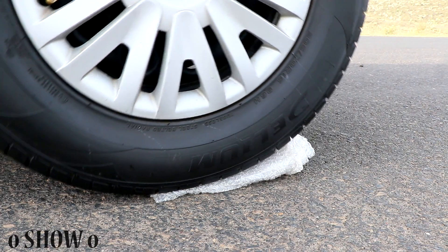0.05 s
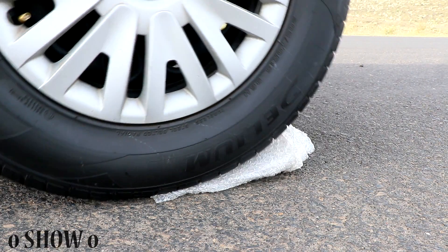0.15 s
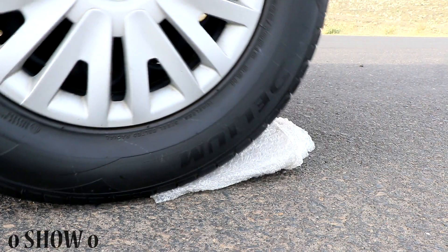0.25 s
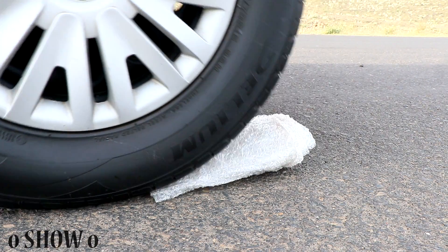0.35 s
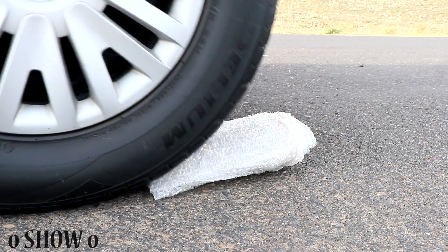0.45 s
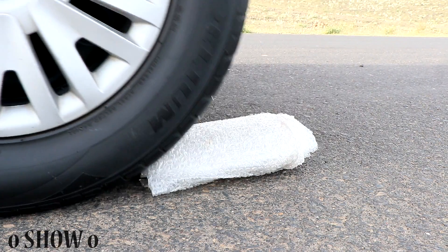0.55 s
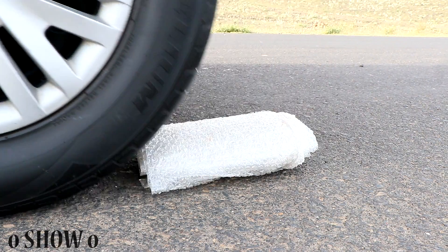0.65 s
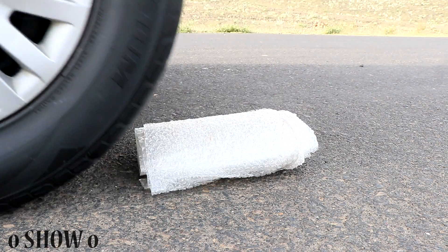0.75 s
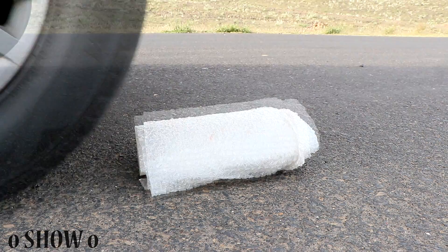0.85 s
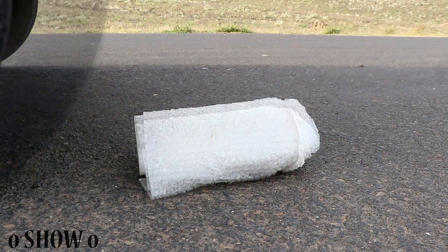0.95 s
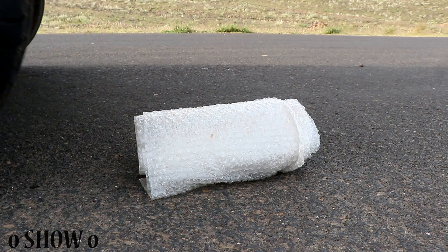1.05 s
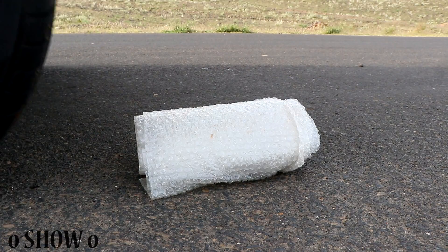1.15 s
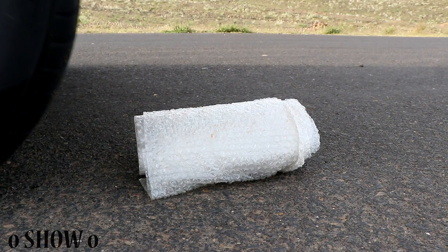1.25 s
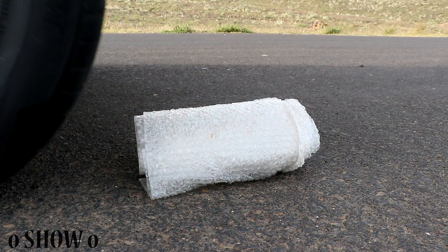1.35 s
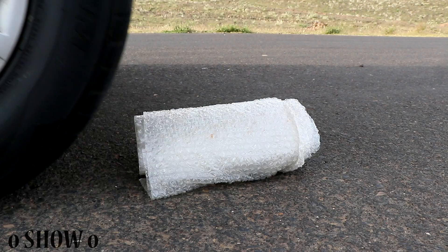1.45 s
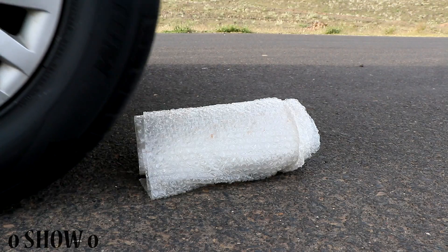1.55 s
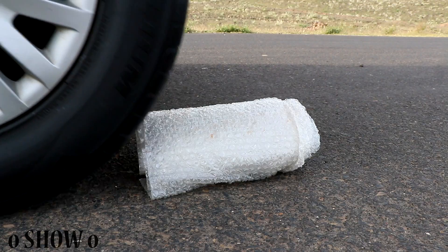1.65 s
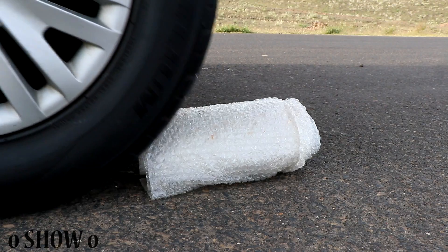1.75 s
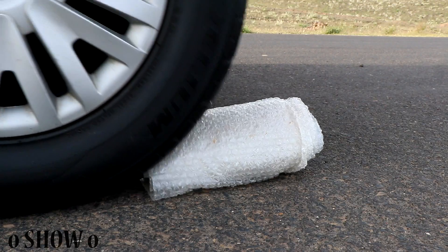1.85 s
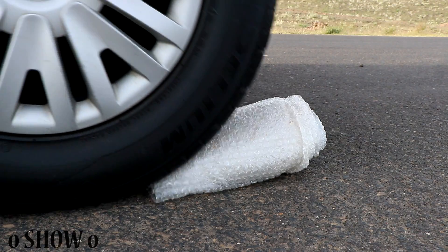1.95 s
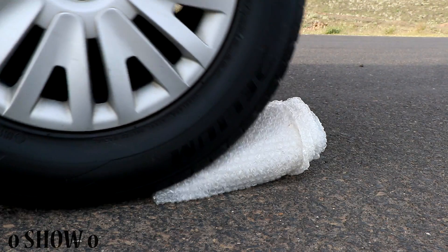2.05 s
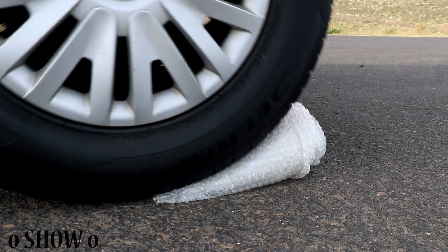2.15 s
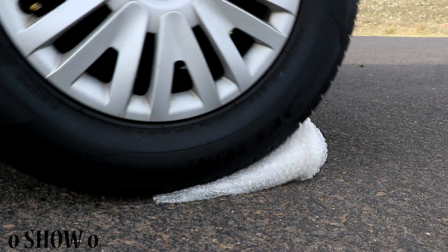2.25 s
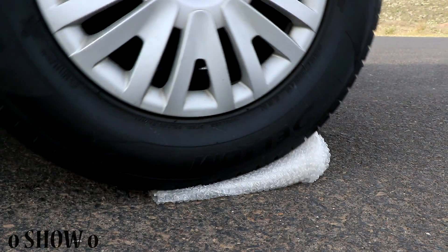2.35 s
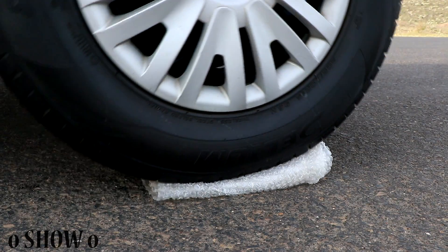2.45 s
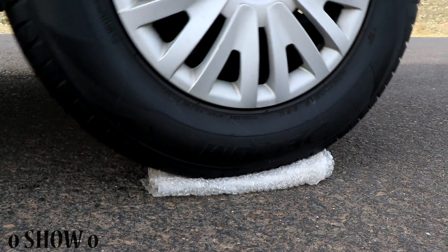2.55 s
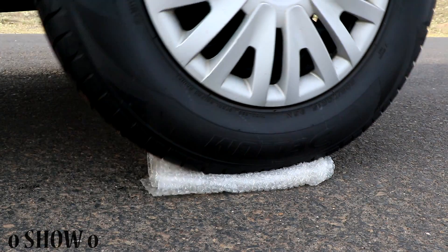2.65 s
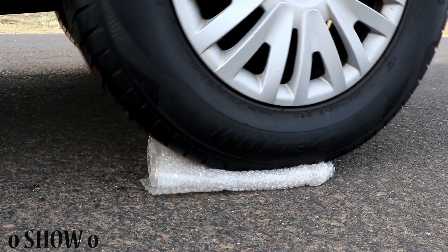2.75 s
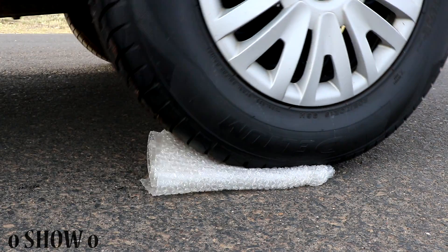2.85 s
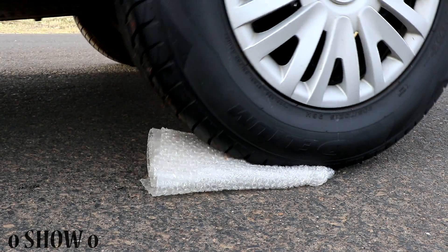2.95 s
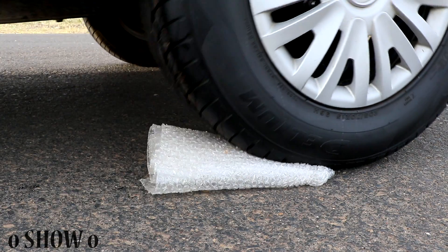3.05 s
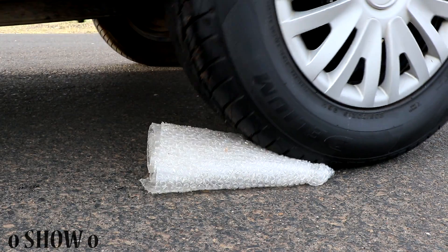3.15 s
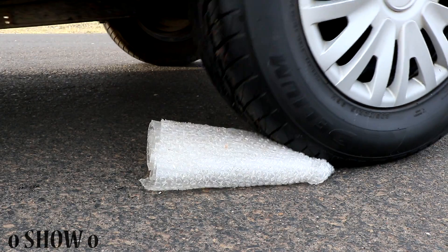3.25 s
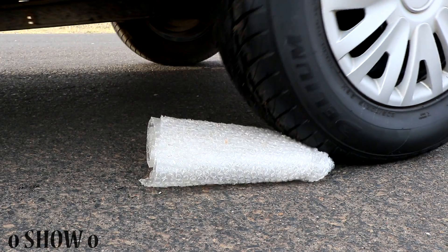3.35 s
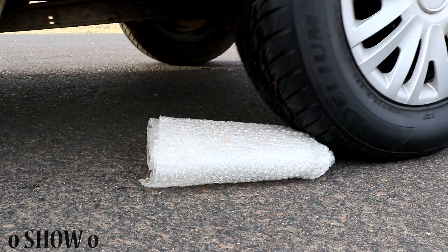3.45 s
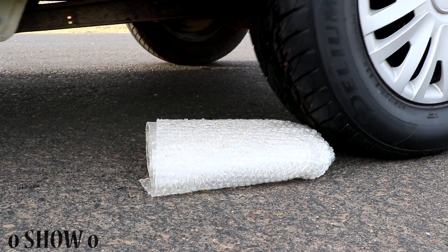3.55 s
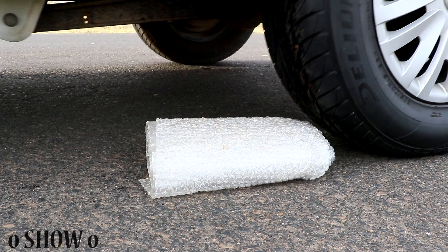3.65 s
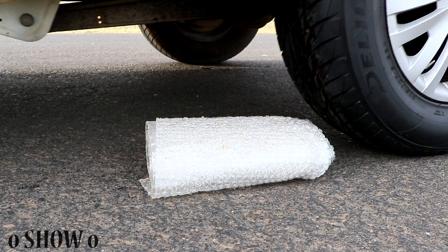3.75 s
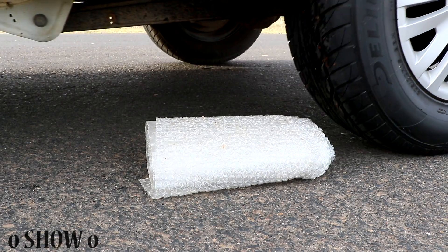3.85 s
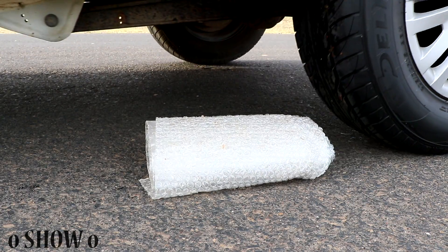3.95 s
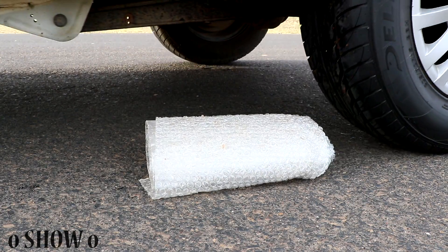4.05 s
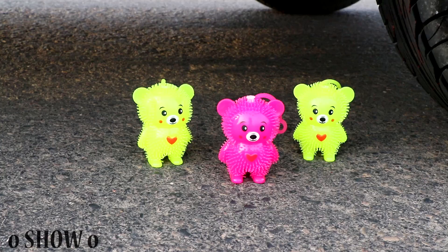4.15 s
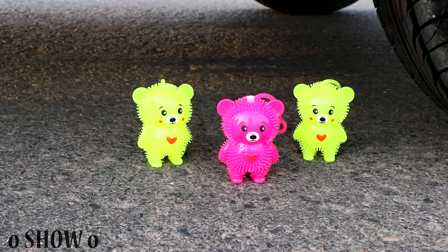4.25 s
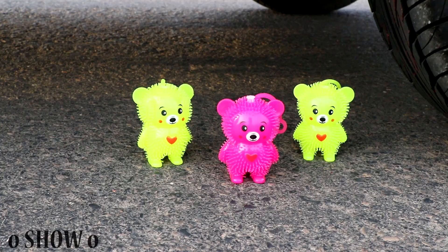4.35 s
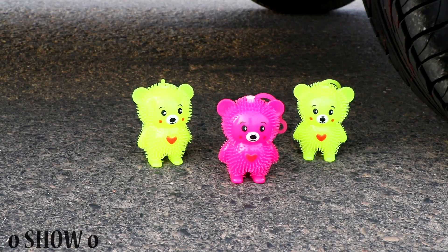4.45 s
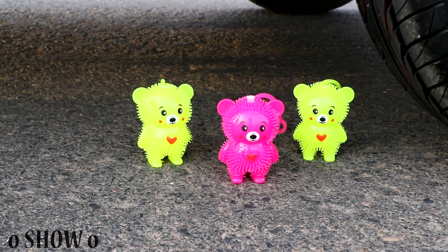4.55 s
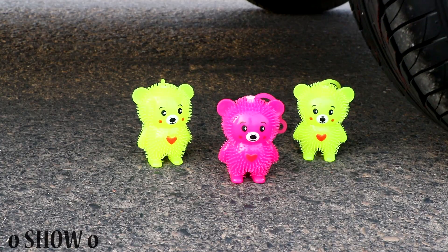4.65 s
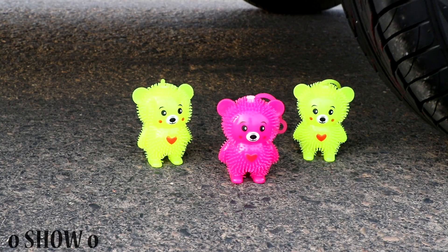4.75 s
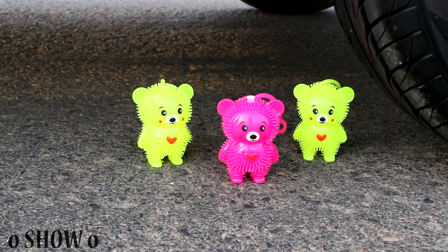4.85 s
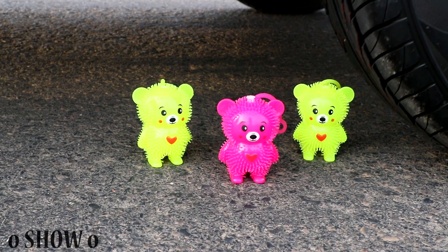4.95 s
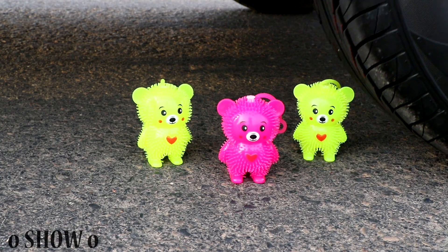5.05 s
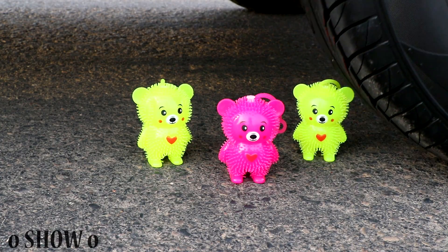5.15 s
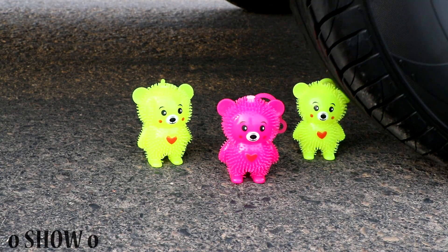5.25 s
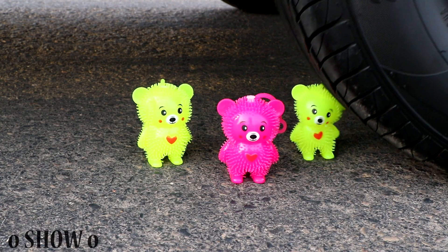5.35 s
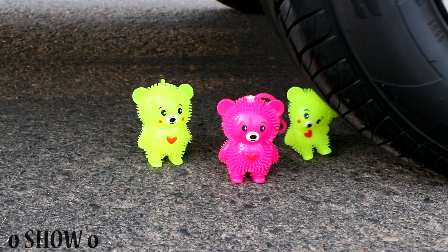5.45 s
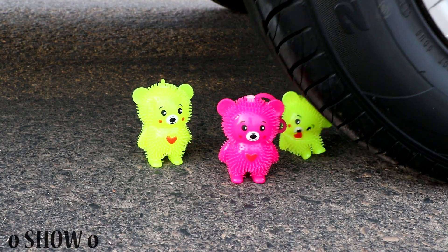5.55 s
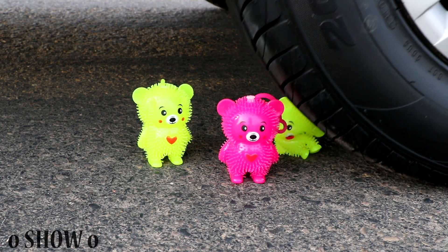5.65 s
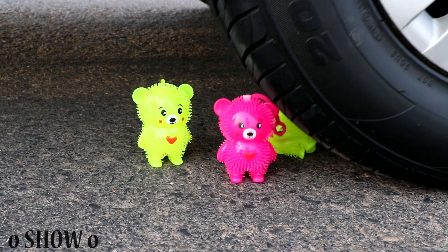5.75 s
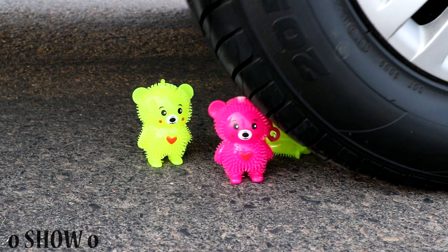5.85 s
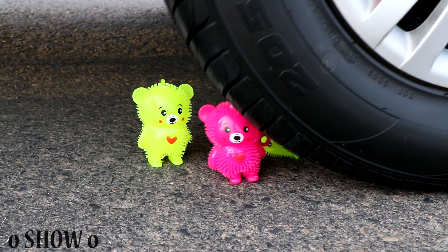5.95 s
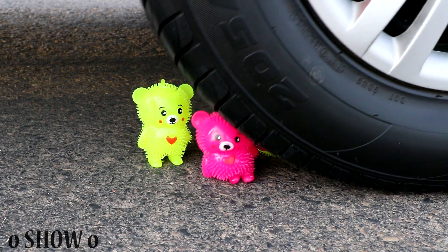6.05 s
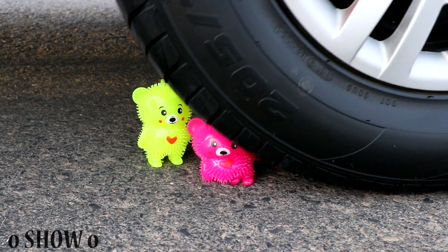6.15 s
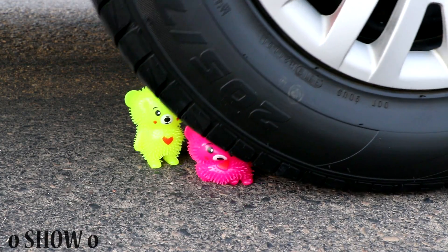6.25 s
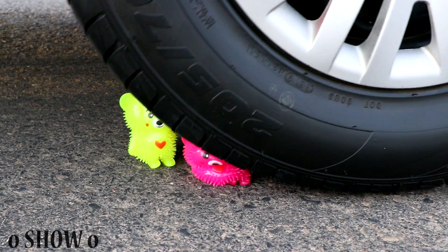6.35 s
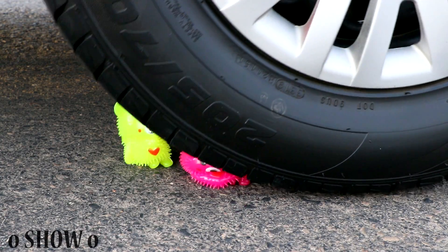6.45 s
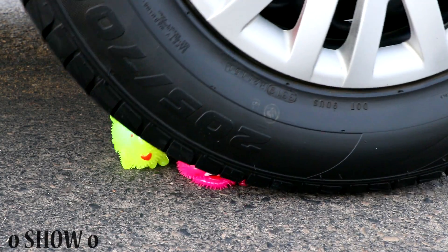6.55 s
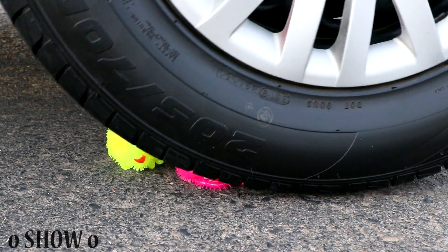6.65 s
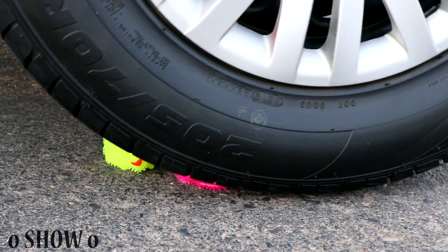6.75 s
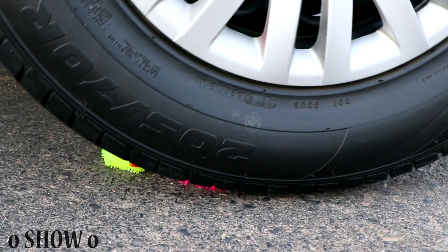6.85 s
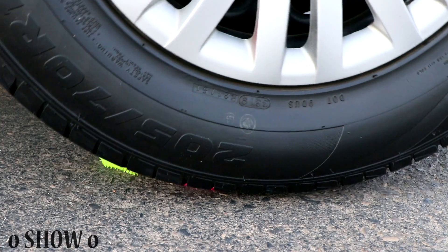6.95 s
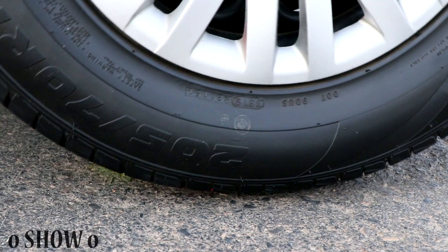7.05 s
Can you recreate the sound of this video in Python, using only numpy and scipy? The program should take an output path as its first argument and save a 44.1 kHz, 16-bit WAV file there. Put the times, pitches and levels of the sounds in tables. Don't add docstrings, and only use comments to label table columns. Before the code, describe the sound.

Very close mono sound of a slowly rolling car tyre. Brief plastic crackle first, low wind and engine wash, faint sighs of squeezed air, then about a second of dense, bright bubble pops with short echoes beneath the car. Quiet idling with a thin whine and drone follows. A reedy toy squeak sinks in pitch before heavy, slightly overloaded bursts, a quick upward whistle, plastic crinkles and escaping air.

```python
import sys
import numpy as np
from scipy import signal
from scipy.fft import rfft, irfft, next_fast_len
from scipy.io import wavfile
from scipy.ndimage import map_coordinates

SR = 44100
rng = np.random.default_rng(int(sys.argv[2]) if len(sys.argv) > 2 else 0)


def dump_mix(stems):
    frames = np.atleast_2d(stems).T
    limited = np.clip(frames, -1, 1)
    pcm = np.round(limited * 32767).astype(np.int16)
    wavfile.write(sys.argv[1], SR, pcm)


def volts_from_decibels(level):
    exponent = np.asarray(level, float) / 20
    return 10 ** exponent


N = 313551

# start in seconds, peak in dB, pitch of the air pocket in Hz, crack in dB.
STRAY_BURSTS = [
    (0.0118, -10, 1140, -14),
    (0.0297, 2.5, 3600, -13.5),
    (0.0854, -27.5, 1090, -14),
    (0.1395, -42, 880, -4.5),
    (0.2394, -36, 1590, -12),
    (0.2991, -35.5, 1200, -24),
    (1.4891, -49.5, 5540, -1.5),
    (1.683, -54, 5500, 0),
]
CLIMB_BURSTS = [(2.2164, -1, 1647, -14), (2.2455, 1, 1770, -12), (2.2688, -3.5, 1608, -3.5),
                (2.2746, -6, 1064, -16), (2.2829, -2, 2338, -11.5), (2.3209, -3.5, 2496, -15),
                (2.336, -14, 1176, -10), (2.3769, -17.5, 2240, -9), (2.3845, 1, 1320, -10.5),
                (2.4103, 5, 933, -9.5), (2.4852, -16, 1450, -33.5), (2.4906, -19, 920, -33.5),
                (2.608, -23, 900, -29.5), (2.6522, -21, 1520, -26)]
CROSSING_BURSTS = [(2.7022, -17.5, 1223, -8), (2.715, 3, 2520, -1.5), (2.7385, 1, 830, 2.5),
                   (2.7445, -10, 1120, -13), (2.7756, -7.5, 900, 0), (2.7865, -12, 905, -15),
                   (2.8214, -17, 601, -16), (2.8266, -13, 755, -17), (2.8307, -1.5, 1040, -9),
                   (2.8752, -8.5, 1394, -16), (2.8887, -17, 910, -8.5), (2.904, -5, 2890, -8.5),
                   (2.9162, -16, 870, -22), (2.9218, 1, 1720, -7), (2.9459, -3.5, 1980, -5),
                   (2.9537, -2, 2083, -6), (2.9684, -8, 1010, -4), (2.9826, -2.5, 1460, -18),
                   (2.9869, 2.5, 2900, -5.5), (2.9914, 2.5, 2277, -4), (3.0002, -2, 1416, -11.5),
                   (3.0079, 3, 2140, -11), (3.0183, 4.5, 2103, -5.5), (3.0208, 3.5, 1520, -8.5),
                   (3.0643, -5, 1470, -10.5), (3.0656, -1.5, 1680, -11)]
MIDDLE_TOY_BURSTS = [(6.0155, 7.5, 1170, -6), (6.063, 4.5, 1130, -3), (6.0999, -5.5, 1280, -6),
                     (6.1233, -6, 4300, -2), (6.1345, -12, 3750, -3.5), (6.1471, -19.5, 3088, -9),
                     (6.1536, -20.5, 1358, -9), (6.173, 0, 2160, -3), (6.1817, 4, 1140, -4.5),
                     (6.1933, -1.5, 810, -9), (6.1981, -3.5, 2220, -6.5), (6.2623, -20, 1900, -10.5),
                     (6.2721, -20, 1930, -15), (6.2861, -18, 1910, 1)]
LAST_TOY_BURSTS = [(6.4334, -13.5, 2878, 0.5), (6.4393, -22.5, 3380, 0), (6.482, 4, 2010, -1),
                   (6.503, 4.5, 600, -7.5), (6.5114, -5, 1040, -3.5), (6.5178, 5, 3490, -7),
                   (6.523, 4, 2010, -4), (6.5587, -1, 1124, 0), (6.571, -6.5, 4996, -0.5),
                   (6.604, 3, 1580, -1.5), (6.611, -3.5, 1090, 1.5), (6.6632, 5.5, 1960, -8),
                   (6.7132, -11.5, 2054, -3), (6.7596, -4.5, 2240, -6), (6.788, -15, 1047, 1),
                   (6.835, -20.5, 1040, -0.5), (6.8578, -8, 3220, -6), (6.8925, -28, 3278, -2),
                   (6.9055, -19.5, 1138, -5), (6.9147, -5, 2890, -0.5), (6.928, -16, 2028, -8.5),
                   (6.9532, -18, 3550, -4.5), (6.9573, -18, 1251, -3), (7.0347, -40, 1250, 5)]
RINGING_BURSTS = [(2.1931, -8, 1140, -17.5), (2.2077, -9, 1117, -21.5), (2.6675, -7.5, 836.5, -23.5),
                  (2.8512, 2, 1840, -8), (2.861, -1.5, 1692, -14), (2.9365, -3, 1663, -14),
                  (6.0667, 3.5, 1140, -9.5), (6.4437, 11.5, 978.5, -5.5), (6.4993, 5.5, 1165, -1),
                  (6.7646, 2.5, 750, -15), (6.7911, 0.5, 1244, -14.5)]
# frequency in Hz, level in dB per Hz.
ECHO_COLOUR = [(250, -39.5), (480, -12.5), (850, 4), (1650, -6.5), (3100, -7.5), (5200, -10.5), (9200, -27),
               (15500, -37.5)]
# frequency in Hz, time to fade by 60 dB in seconds.
ECHO_FADE = [(300, 0.57), (800, 0.085), (2000, 0.12), (6000, 0.14), (14000, 0.05)]

# time in seconds, pitch in Hz, level in dB.
FIRST_REED = [
    (5.48, 955.5, -8.5),
    (5.49, 951.5, -10.5),
    (5.569, 916.4, -13.5),
    (5.64, 922, -13),
    (5.706, 924.6, -11.5),
    (5.713, 908, -11),
    (5.762, 905.5, -12.5),
    (5.831, 878, -18),
    (5.86, 877.5, -16),
]
# time in seconds, width in seconds, pitch change in Hz, level change in dB.
FALTERS = [
    (5.603, 0.017, -52, -4),
    (5.802, 0.013, -24, -5.5),
    (5.885, 0.021, -27.5, -5.5),
]
# frequency in Hz, level in dB when open, level in dB when squashed.
TOY_BODY = [(885, -18.5, -16), (1830, -33, -25), (2780, -22.5, -29), (3360, -16, -22.5), (3900, 3, -22),
            (4610, -0.5, 2.5), (5600, -7.5, -0.5), (5500, -19, 0), (5800, -13.5, -15), (6170, -2, -1),
            (8200, -10.5, -15), (9900, -14.5, -19), (10000, -26.5, -29.5), (15000, -45, -51)]
FOLDING_S = (5.55, 5.65)
# time in seconds, pitch in Hz, level in dB.
LAST_REED = [
    (6.54, 917, -48),
    (6.552, 972, -24),
    (6.565, 1024, -18.5),
    (6.585, 1043, -17),
    (6.62, 1054, -19.5),
    (6.655, 1037, -19.5),
    (6.7, 1028, -20.5),
    (6.735, 966, -32.5),
    (6.755, 965, -44),
]
# multiple of the pitch, level in dB.
LAST_REED_OVERTONES = [(1, -1), (2, -11), (3, -8.5), (4, -8), (5, 2.5), (6, -6), (7, -7), (8, -12),
                       (9, -20), (10, -28), (11, -32.5), (12, -31), (13, -32.5), (14, -34.5)]
# time in seconds, pitch in Hz, level in dB.
RISING_WHISTLE = [
    (6.205, 2520, -17),
    (6.22, 2460, -33),
    (6.228, 2670, -16.5),
    (6.24, 2970, -22),
    (6.26, 3730, -8),
    (6.27, 3950, -23.5),
    (6.32, 4900, -24),
    (6.345, 5400, -39.5),
    (6.385, 5620, -46.5),
]
THIN_WHISTLE = [
    (6.415, 9120, -55.5),
    (6.45, 9150, -37),
    (6.5, 10630, -39),
    (6.512, 10700, -48.5),
]
BUBBLE_WHISTLE = [
    (.031, 3300, -26.5),
    (.045, 3700, -30),
    (.06, 3900, -43.5),
]

# start in seconds, hold in seconds, crinkle in dB.
SQUEEZES = [(0, .04, -36.5), (2.21, .19, -31), (2.5, .14, -54), (2.68, .02, -47), (2.83, .18, -33.5),
            (3.12, .08, -57), (6.0, .01, -41.5), (6.19, .02, -32.5), (6.44, .1, -32.5), (6.62, .1, -38.5),
            (6.79, .01, -32), (6.9, .1, -52.5)]
# frequency in Hz, level in dB per Hz.
CRINKLE_COLOUR = [(200, -50.5), (350, -30), (520, -8), (750, -9.5), (1100, -2), (2000, -7.5), (3000, -14),
                  (5000, -16), (9700, -30), (14500, -33.5), (16000, -46.5)]
# start in seconds, hold in seconds, level in dB.
ROLL_SIGHS = [
    (1.79, 0.0091, -58.5),
    (1.86, .01, -59),
    (1.95, .01, -51),
    (2.045, 0.0078, -46),
    (2.115, .04, -58),
    (2.19, 0.011, -33.5),
]
# start in seconds, hold in seconds, hiss in dB.
LEAKS = [
    (6.45, .29, -51.5),
    (6.888, .015, -32.5),
]
# frequency in Hz, level in dB per Hz.
LEAK_COLOUR = [(880, -40), (1500, -3), (2050, -8), (3350, -3.5), (12600, -17), (15400, -7.5), (16000, -7),
               (16500, -20)]
# start in seconds, hold in seconds, level in dB.
REED_BREATHS = [
    (5.483, 0.0045, -32),
    (5.5, 0.34, -51.5),
    (5.565, .004, -42),
    (5.67, 0.023, -43),
]

# time in seconds, wind in dB, engine in dB.
IDLE_LEVELS = [(0, -60, -61.5), (.53, -61.5, -65), (1.21, -52.5, -66), (1.55, -60.5, -67),
               (2.35, -53, -60.5), (3.13, -77.5, -63.5), (3.55, -76.5, -62.5), (4.1, -72.5, -62.5),
               (4.3, -86, -64.5), (5.15, -81, -64.5), (5.86, -80, -63), (7.11, -86, -67.5)]
# frequency in Hz, level in dB per Hz.
WIND_COLOUR = [(8.8, -39), (15, 1), (38, -1.5), (75, -12), (160, -20.5), (210, -49.5), (350, -120)]
# frequency in Hz, level in dB per Hz.
ENGINE_COLOUR = [(30, -7.5), (100, -7), (250, -2.5), (600, -1.5), (1000, -3), (1500, -8.5), (2800, -11.5),
                 (3400, -10), (4300, -18), (7000, -24), (12000, -38), (17000, -46.5)]
# frequency in Hz, width in Hz.
DRONE = [
    (328, 26),
    (388, 12),
]
# start in seconds, hold in seconds, level in dB.
LOW_DRONE_SWELLS = [
    (0.898, .1, -70.5),
    (1.522, .06, -57),
    (2.197, .9, -65),
    (4.451, 1.0, -64.5),
    (5.496, .05, -61.5),
    (5.9, 1.2, -66),
]
HIGH_DRONE_SWELLS = [
    (0, 1.55, -69),
    (3.3, 0.92, -63.5),
    (4.52, 0.048, -60.5),
    (4.8, 0.082, -57),
    (5.45, 0.13, -55.5),
]
# frequency in Hz, width in Hz, level in dB.
ENGINE_WHINES = [(1040, 17, -1), (1355, 40, -3.5), (1860, 40, -9.5), (2380, 25, -0.5), (3190, 40, -3.5),
                 (3840, 30, -12.5), (4900, 50, -14)]
# start in seconds, hold in seconds, level in dB.
WHINE_SWELLS = [
    (0, 7.11, -80),
    (2.2, 1.95, -71),
]


def unit(x):
    return x / np.sqrt(np.mean(x ** 2) + 1e-20)


def along(points, hz):
    f, value = np.transpose(points)
    return np.interp(np.log(hz + 1), np.log(f + 1), value)


def curves(rows):
    s, *columns = np.transpose(rows)
    return [np.interp(np.arange(N) / SR, s, column) for column in columns]


def during(rows):
    t = np.arange(N) / SR
    return np.clip(np.minimum(t - rows[0][0], rows[-1][0] - t) / 0.0029, 0, 1)


def swells(rows, rise_db_s, fall_db_s):
    t = np.arange(N) / SR
    total = 0
    for s, hold, db in rows:
        before, after = np.maximum(s - t, 0), np.maximum(t - s - hold, 0)
        total = total + volts_from_decibels(db - rise_db_s * before - fall_db_s * after)
    return total


def wobble(rate):
    knots = rng.standard_normal(int(N * rate / SR) + 4)
    return map_coordinates(knots, [np.arange(N) * rate / SR])


def filtered(x, response):
    m = next_fast_len(len(x) + 8192)
    return irfft(rfft(x, m) * response(np.fft.rfftfreq(m, 1 / SR)), m)[:len(x)]


def modes(rows):
    def response(f):
        total = 0
        for k, (centre, width, db) in enumerate(rows):
            band = 1j * f * width
            total = total + (-1) ** k * volts_from_decibels(db) * band / (centre ** 2 - f * f + band)
        return total
    return response


def noise(response):
    return unit(filtered(rng.standard_normal(N), response))


def coloured_noise(colour):
    return noise(lambda hz: volts_from_decibels(along(colour, hz)))


def resonant_noise(hz, width):
    return noise(lambda f: modes([(hz, width, 0)])(f) ** 2)


def echo(length):
    hz, t, z = signal.stft(rng.standard_normal(length), SR, nperseg=128)
    fade = volts_from_decibels(-60 * t / along(ECHO_FADE, hz)[:, None])
    tail = signal.istft(z * fade, SR, nperseg=128)[1][:length]
    return tail / np.linalg.norm(tail)


def burst_near(db, hz, crack_db, muffled, ring_db, cycles, dull_hz):
    t = np.arange(1500) / SR
    turn = t * np.sqrt(hz * np.clip(4000 + 150 * crack_db, 900, 2600))
    swing = -np.exp(-((turn - .5) / .5) ** 2) * np.sin(2 * np.pi * turn)
    ring = -volts_from_decibels(ring_db - 60 * t * hz / cycles) * np.sin(2 * np.pi * hz * t)
    ring *= 1 - np.exp(-3 * t * hz)
    crack = np.diff(volts_from_decibels(-60 * t / 0.0011) * rng.standard_normal(len(t)), prepend=0)
    bright_hz = dull_hz * volts_from_decibels(0.086 * db)
    crack = filtered(crack, lambda f: 1 / (1 + 1j * f / bright_hz) ** 3)
    near = swing + ring + volts_from_decibels(crack_db - 3.0) * crack / np.abs(crack).max()
    near = filtered(near, lambda f: 1 / (1 + 1j * f * muffled / 9000) ** 2)
    return near / np.abs(near).max()


def burst_echo(hz, crack_db):
    def colour(f):
        pocket = 1 + 1.8 * modes([(hz, .15 * hz, 0)])(f)
        brightness = (1 + f / 2500) ** ((crack_db + 7.5) / 11)
        return volts_from_decibels(along(ECHO_COLOUR, f)) * pocket * brightness

    t = np.arange(7000) / SR
    far = filtered(echo(7000), colour)
    far *= volts_from_decibels(-60 * t / 0.027) + volts_from_decibels(-13.0)
    far *= 1 - np.exp(-t / 0.00071)
    return far / np.sqrt(np.mean(far[100:400] ** 2))


def bursts(table, ring_db, cycles, dull_hz, bass_hz, wet_db):
    out = np.zeros(N + SR)
    for s, db, hz, crack_db in table:
        muffled = max(-12 - crack_db, 0)
        echo_db = wet_db - 0.06 * db + 0.6 * muffled
        near = burst_near(db, hz, crack_db, muffled, ring_db, cycles, dull_hz)
        far = burst_echo(hz, crack_db)
        start = round(s * SR) - 4
        out[start:][:len(near)] += volts_from_decibels(db + 1.5) * near
        out[start + 20:][:len(far)] += volts_from_decibels(db + echo_db - 2.5) * far
    return filtered(out[:N], lambda f: (1j * f) ** 2 / (bass_hz ** 2 - f * f + 1.3j * f * bass_hz))


def all_bursts():
    climb = bursts(CLIMB_BURSTS, ring_db=-10, cycles=8, dull_hz=8600, bass_hz=750, wet_db=-18)
    crossing = bursts(STRAY_BURSTS + CROSSING_BURSTS, ring_db=-9.5, cycles=10, dull_hz=8600,
                      bass_hz=563, wet_db=-19.0)
    toys = bursts(MIDDLE_TOY_BURSTS + LAST_TOY_BURSTS, ring_db=-1.0, cycles=5.9, dull_hz=8700,
                  bass_hz=285, wet_db=-18.5)
    ringing = bursts(RINGING_BURSTS, ring_db=0.5, cycles=15, dull_hz=9000, bass_hz=420, wet_db=-16)
    return climb + crossing + toys + ringing


def reed(pitch, levels_db, flutter_db):
    phase = 2 * np.pi * np.cumsum(pitch * (1 + 0.00077 * wobble(150))) / SR
    total = 0
    for k, db in levels_db:
        strength = volts_from_decibels(db + flutter_db * wobble(25))
        total = total + strength * np.cos(k * phase + 0.24 * k * k)
    return total


def first_squeaker():
    pitch, level_db = curves(FIRST_REED)
    t = np.arange(N) / SR
    for s, width, change_hz, change_db in FALTERS:
        falter = np.exp(-((t - s) / width) ** 2)
        pitch = pitch + change_hz * falter
        level_db = level_db + change_db * falter
    start, end = FIRST_REED[0][0], FIRST_REED[-1][0]
    blown = swells([(start, end - start, 0)], rise_db_s=3997.5, fall_db_s=900)
    squash = np.interp(t, FOLDING_S, [0, 1])
    hz, open_db, flat_db = np.transpose(TOY_BODY)
    levels_db = []
    for k in range(1, 18):
        open_level = np.interp(k * pitch, hz, open_db)
        flat_level = np.interp(k * pitch, hz, flat_db)
        levels_db.append((k, (1 - squash) * open_level + squash * flat_level))
    total = np.sqrt(sum(volts_from_decibels(db) ** 2 for _, db in levels_db) / 2)
    return volts_from_decibels(level_db) * blown * reed(pitch, levels_db, flutter_db=0.0) / total


def last_squeaker():
    pitch, level_db = curves(LAST_REED)
    sound = reed(pitch, LAST_REED_OVERTONES, flutter_db=3.0)
    return volts_from_decibels(level_db + 1.5) * during(LAST_REED) * sound


def whistle(rows, octave_db=-90):
    pitch, level_db = curves(rows)
    too_high = np.maximum(pitch - 4720, 0)
    second_db = octave_db + .4 * level_db - .12 * too_high
    phase = 2 * np.pi * np.cumsum(pitch * (1 + .007 * wobble(400))) / SR
    main = volts_from_decibels(level_db + 2.5 * wobble(180)) * np.sin(phase)
    overtones = np.sin(2 * phase) + .15 * (pitch < 3600) * np.sin(3 * phase)
    overtones = volts_from_decibels(second_db + 5.5 * wobble(160)) * overtones
    return np.sqrt(2) * during(rows) * (main + overtones)


def squeals():
    tones = first_squeaker() + last_squeaker()
    tones = tones + whistle(RISING_WHISTLE, octave_db=-24) + whistle(THIN_WHISTLE) + whistle(BUBBLE_WHISTLE)
    return tones + volts_from_decibels(-16) * signal.fftconvolve(tones, echo(9000))[:N]


def crinkle():
    snaps = rng.random(N) < 600 / SR
    snaps = snaps * volts_from_decibels(1.2 * rng.exponential(size=N)) * rng.standard_normal(N)
    grain = volts_from_decibels(-60 * np.arange(500) / SR / 0.016) * rng.standard_normal(500)
    grains = signal.fftconvolve(snaps, grain)[:N]
    rubbing = volts_from_decibels(3.2 * wobble(40)) * rng.standard_normal(N)
    mix = 0.84 * unit(grains) + 0.58 * unit(rubbing)
    mix = filtered(mix, lambda hz: volts_from_decibels(along(CRINKLE_COLOUR, hz)))
    return swells(SQUEEZES, rise_db_s=331, fall_db_s=189.5) * unit(mix)


def roll_sigh():
    return swells(ROLL_SIGHS, rise_db_s=285, fall_db_s=380) * resonant_noise(740, 260)


def leak():
    gusts = volts_from_decibels(2 * wobble(47))
    return swells(LEAKS, rise_db_s=749, fall_db_s=502.5) * gusts * coloured_noise(LEAK_COLOUR)


def reed_breath():
    air = noise(lambda f: modes([(4600, 2200, 0), (8000, 3500, -4)])(f) ** 2)
    return swells(REED_BREATHS, rise_db_s=649, fall_db_s=454) * air


def idling_car():
    wind_db, engine_db = curves(IDLE_LEVELS)
    wind = volts_from_decibels(wind_db - 1.5 + 2 * wobble(11)) * coloured_noise(WIND_COLOUR)
    drone = 0
    for (hz, width), rows in zip(DRONE, [LOW_DRONE_SWELLS, HIGH_DRONE_SWELLS]):
        drone = drone + swells(rows, rise_db_s=60, fall_db_s=60) * resonant_noise(hz, width)
    whines = 0
    for hz, width, db in ENGINE_WHINES:
        whines = whines + volts_from_decibels(db + 1.3 * wobble(0.99)) * resonant_noise(hz, width)
    whines = swells(WHINE_SWELLS, rise_db_s=30, fall_db_s=200) * whines
    wash = volts_from_decibels(engine_db + 3.5 + 1.0 * wobble(14)) * coloured_noise(ENGINE_COLOUR)
    return wind + drone + wash + whines


def scene():
    air = roll_sigh() + leak() + reed_breath()
    mix = all_bursts() + squeals() + crinkle() + air + idling_car()
    return mix[None]


def band_limit(x):
    return signal.sosfilt(signal.butter(12, 16810, fs=SR, output="sos"), x)


def record(dry):
    hardness = 8
    clipped = dry / (1 + np.abs(dry) ** hardness) ** (1 / hardness)
    finished = filtered(clipped[0], lambda hz: np.clip((16400 - hz) / 800, .1, 1))[None]
    return band_limit(finished)


dry = scene()
out = record(dry)
dump_mix(out)
```